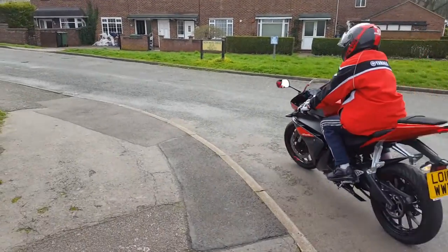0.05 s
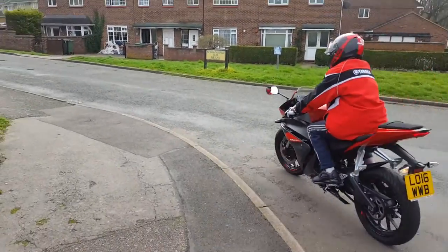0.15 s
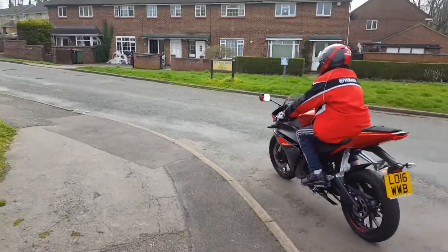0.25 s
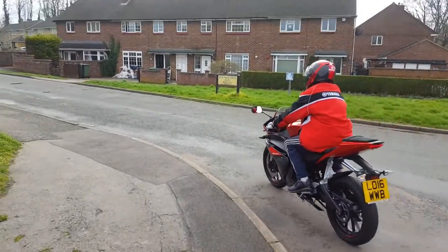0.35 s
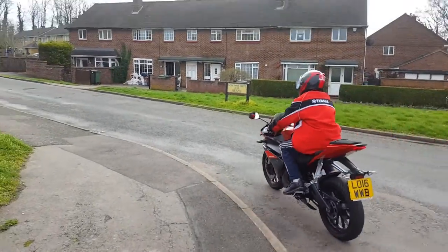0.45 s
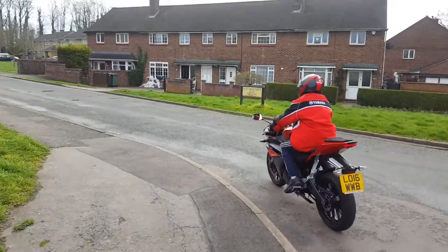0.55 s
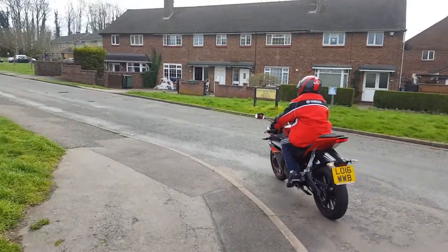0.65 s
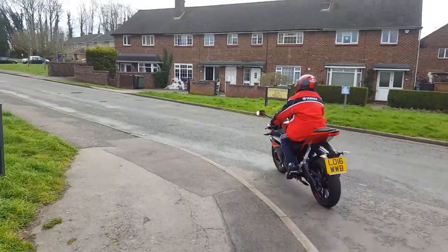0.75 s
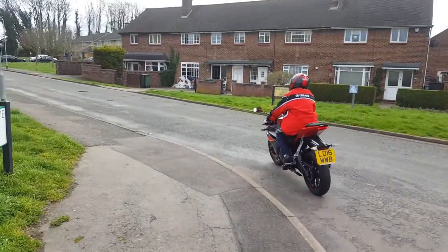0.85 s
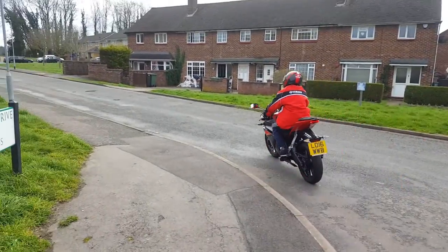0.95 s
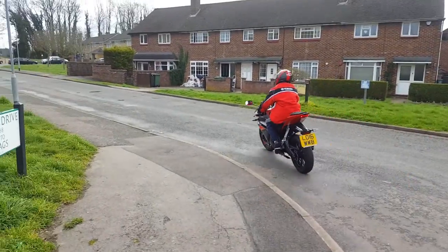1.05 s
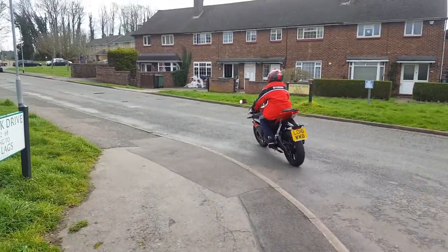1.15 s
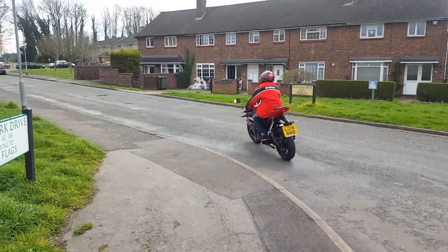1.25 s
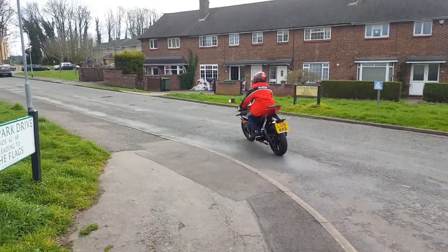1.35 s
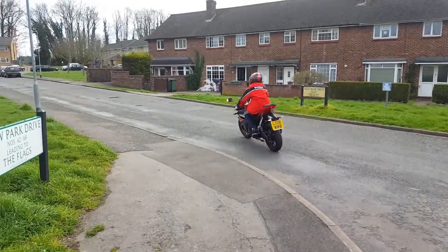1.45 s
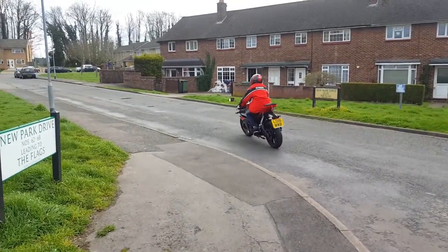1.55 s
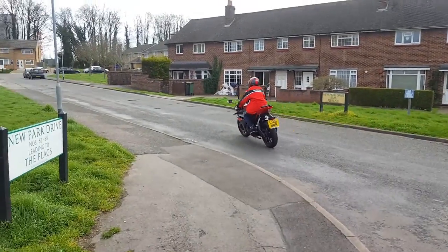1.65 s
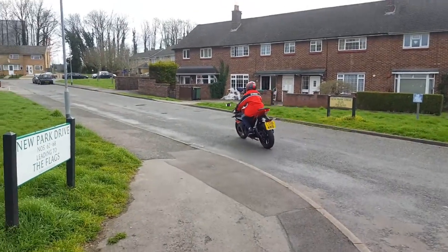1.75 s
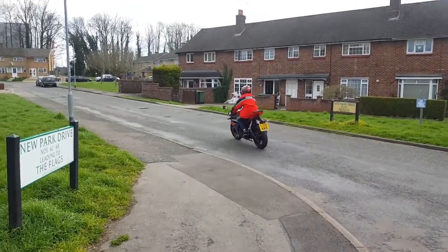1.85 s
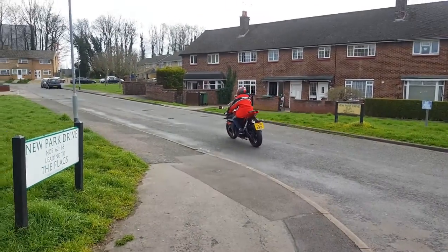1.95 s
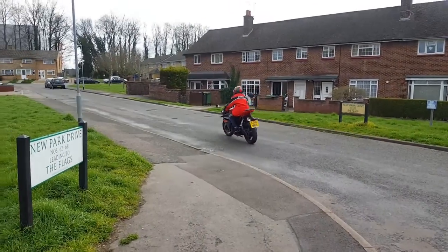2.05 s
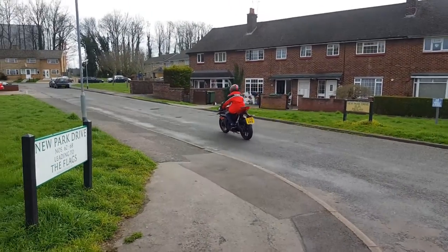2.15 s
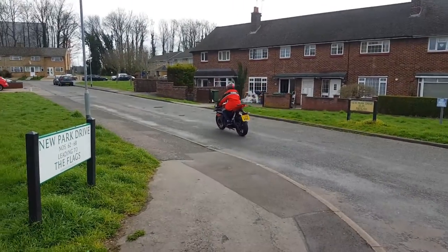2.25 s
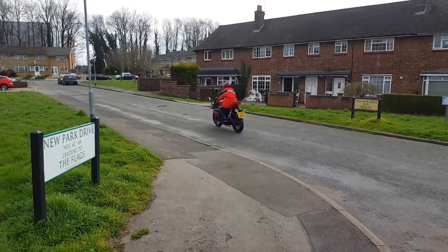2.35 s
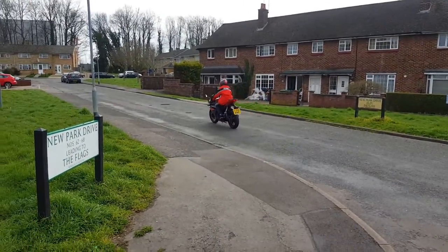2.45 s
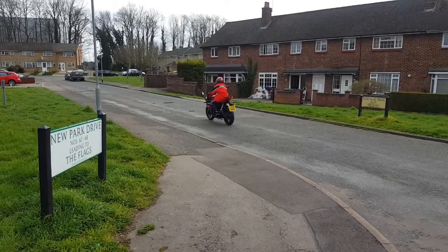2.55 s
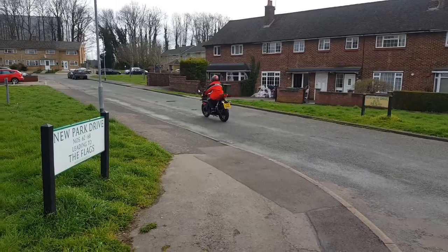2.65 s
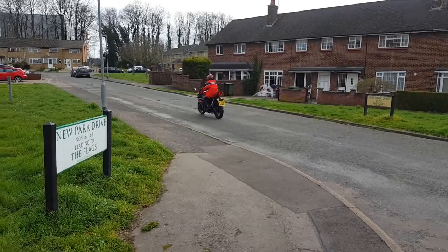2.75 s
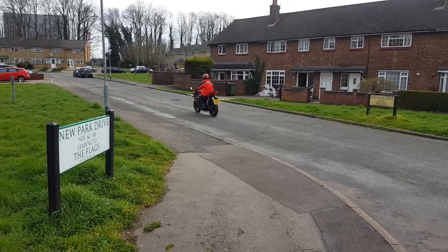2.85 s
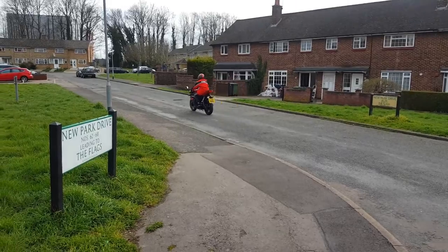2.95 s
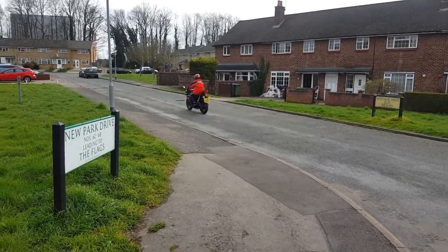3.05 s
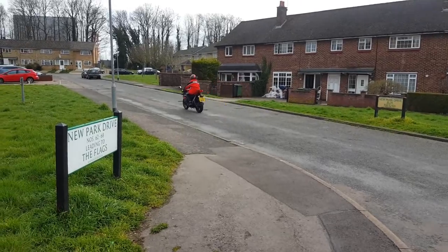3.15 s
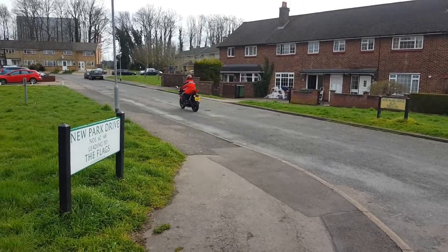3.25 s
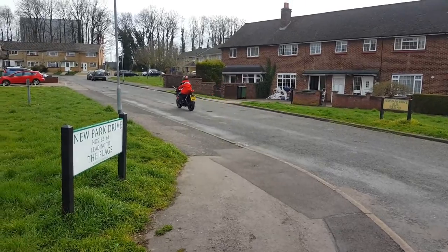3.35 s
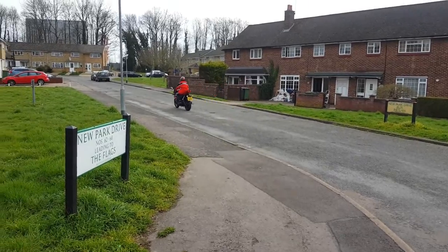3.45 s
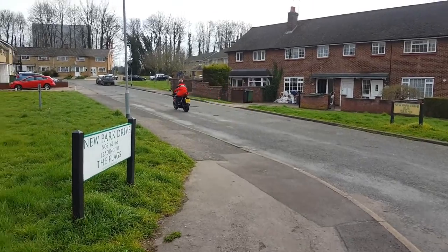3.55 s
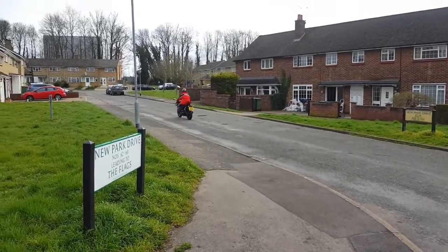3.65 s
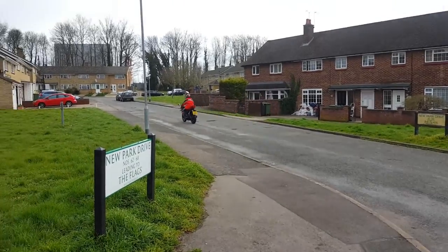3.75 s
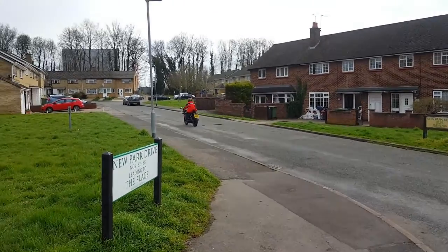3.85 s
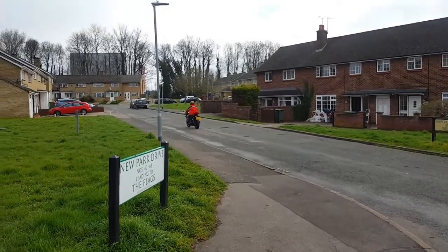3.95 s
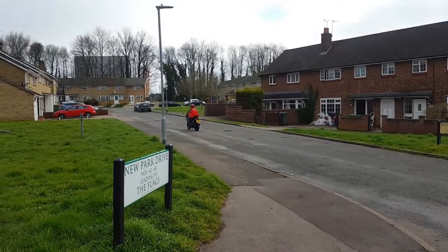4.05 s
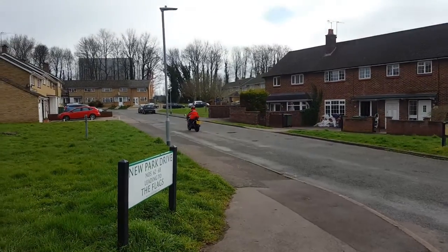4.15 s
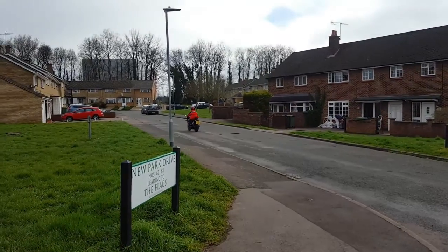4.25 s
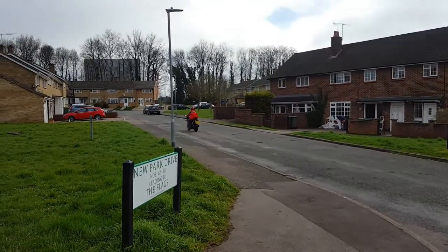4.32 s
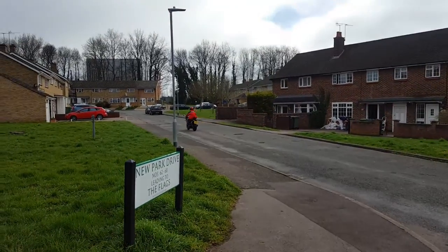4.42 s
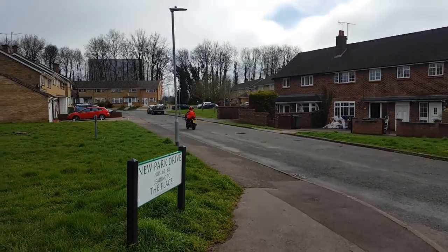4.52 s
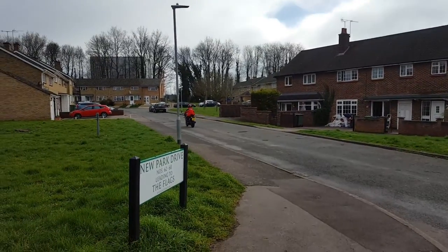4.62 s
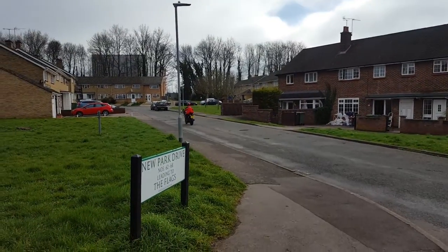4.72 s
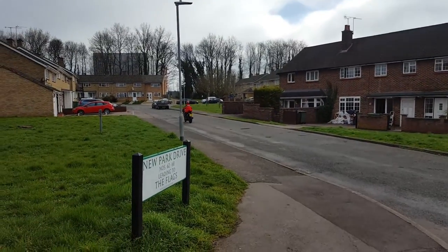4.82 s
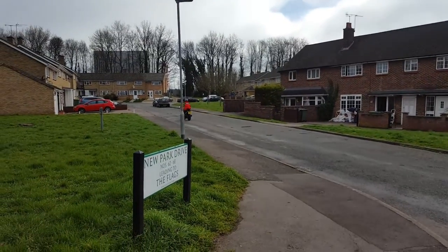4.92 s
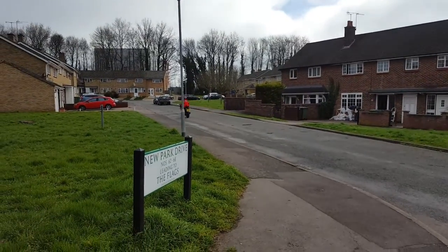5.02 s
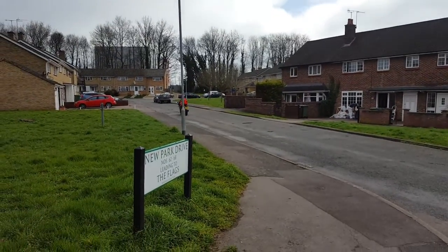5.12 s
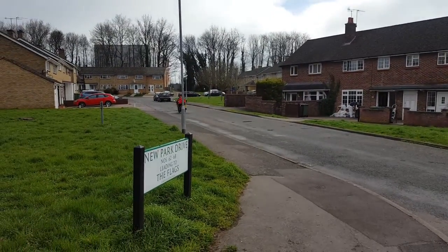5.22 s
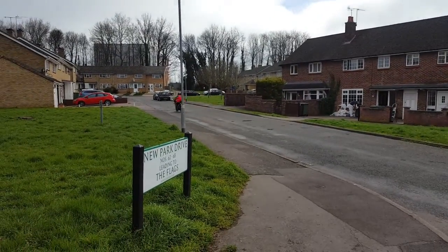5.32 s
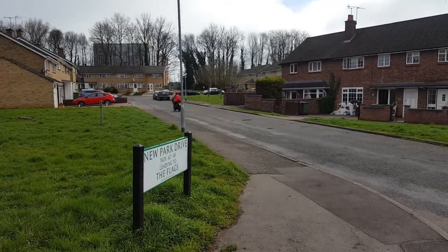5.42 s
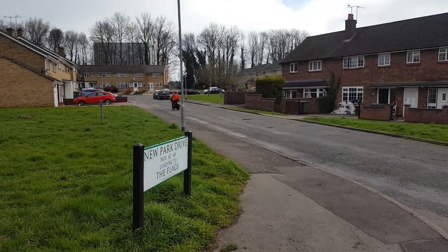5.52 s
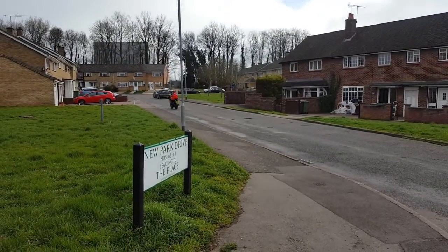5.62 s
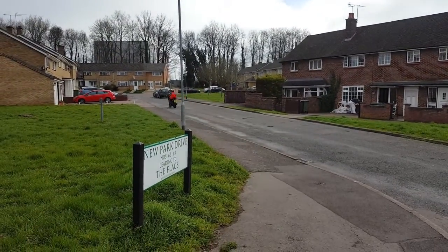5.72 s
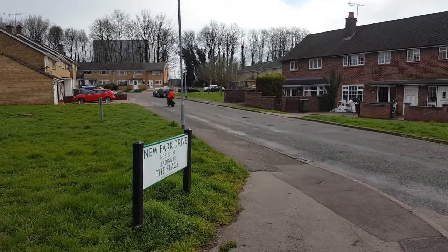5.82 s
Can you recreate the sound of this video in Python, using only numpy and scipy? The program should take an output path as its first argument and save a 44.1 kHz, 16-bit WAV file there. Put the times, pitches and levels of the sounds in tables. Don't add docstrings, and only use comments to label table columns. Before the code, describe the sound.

Outdoors on a street of brick houses, a handheld stereo microphone at the kerb hears a single-cylinder motorcycle leave from about three metres. It thumps loudly with hissing valve gear, dips and pops at an upshift around two seconds, pulls again in a deeper gear, then coasts into a quiet, lumpy idle far off, over low town rumble and small close ticks.

```python
import sys
import numpy as np
from scipy import signal
from scipy.fft import rfft, irfft, next_fast_len
from scipy.io import wavfile
from scipy.ndimage import uniform_filter1d

SR = 44100
rng = np.random.default_rng(int(sys.argv[2]) if len(sys.argv) > 2 else 0)


def transcribe(u):
    v = np.clip(np.atleast_2d(u).T, -1, 1)
    q = np.round(v * 32767).astype(np.int16)
    wavfile.write(sys.argv[1], SR, q)


def gain_from_db(level_db):
    decades = np.asarray(level_db, float) / 20
    return 10 ** decades


N = 259131
A_FIRING_S, IDLE_FIRING_S = 2.704, 5.183
START_M, SPEED_M_S, ACCEL_M_S2 = 2.87, 3.91, 0.79


def level(x, rms_db):
    return x * gain_from_db(rms_db) / np.sqrt(np.mean(x ** 2))


def curves(table):
    s, *columns = np.transpose(table)
    return [np.interp(np.arange(N) / SR, s, column) for column in columns]


def steps(table, slew_s):
    s, *columns = np.transpose(table)
    row = np.maximum(np.searchsorted(s, np.arange(N) / SR, "right") - 1, 0)
    return [uniform_filter1d(column[row], int(slew_s * SR), mode="nearest") for column in columns]


def colour(x, points):
    hz, db = np.transpose(points)
    size = next_fast_len(N + SR // 4)
    f = np.maximum(np.arange(size // 2 + 1) * SR / size, 1)
    gain_db = np.interp(np.log(f), np.log(hz), db)
    return irfft(rfft(x, size) * gain_from_db(gain_db), size)[..., :N]


def blend(x, points, share):
    share = np.clip(share, 0, 1)
    return (1 - share) * x + share * colour(x, points)


def later(x, samples):
    return np.interp(np.arange(N) - samples, np.arange(N), x)


def walk(rate_hz):
    hold = int(SR / rate_hz)
    held = np.repeat(rng.standard_normal(N // hold + 1), hold)
    return 1.48 * uniform_filter1d(uniform_filter1d(held, hold), hold)[:N]


def lingering(x, fall_s):
    share = 1 / (fall_s * SR)
    return np.maximum(x, signal.lfilter([share], [1, share - 1], x))


def ring(x, hz, width_hz):
    return signal.lfilter(*signal.iirpeak(hz, hz / width_hz, SR), x)


def gust():
    peak_s, peak_db, calm_db = 4.62, -65, -90
    rise_db_s, fall_db_s = 20, 130
    t = np.arange(N) / SR - peak_s
    return gain_from_db(np.maximum(peak_db + np.minimum(rise_db_s * t, -fall_db_s * t), calm_db))


# freq_hz, density_db (per Hz)
TOWN_RUMBLE = [(12, -42), (20, -9), (148, 3.5), (404, -3), (505, -7.5), (1010, -12.5), (1230, -17),
               (2140, -19), (2530, -25), (3540, -27.5), (7930, -39), (9370, -49), (15500, -41)]
# freq_hz, level_db
FAR_WHINES = [(505, -53), (4900, -72)]


def town():
    mid, side = colour(rng.standard_normal((2, N)), TOWN_RUMBLE)
    side = colour(side, [(30, -8), (150, -21.5), (600, -4.0), (2500, -2.0), (6000, -1.5)])
    rumble = level(gain_from_db(0.4 * walk(2.46)) * np.array([mid + side, mid - side]), -40.5)
    leaves = gust() * level(ring(rng.standard_normal((2, N)), 9200, 6000), 1.19)
    whines = np.zeros(N)
    for hz, db in FAR_WHINES:
        turns = hz * np.cumsum(1 + 0.00329 * walk(6)) / SR
        whines += gain_from_db(db + 2 * walk(3.3)) * np.sin(2 * np.pi * turns)
    return rumble + whines + leaves


# start_s, peak_db, pitch_hz, t60_s
KNOCKS_AND_TICKS = [(1.4905, -11, 170, .035), (1.912, -31, 2450, .04), (1.914, -32, 4200, .015),
                    (1.916, -31, 6500, .015), (1.917, -35, 12000, .012), (2.76, -44, 7000, .01),
                    (5.015, -38, 1650, .06), (5.203, -54, 6900, .02), (5.215, -52, 6100, .04),
                    (5.312, -47, 6400, .02), (5.483, -46, 3500, .04), (5.488, -44, 1450, .04),
                    (5.67, -48, 4100, .07), (5.69, -48, 3700, .07)]


def knocks():
    out, t = np.zeros(N), np.arange(4096) / SR
    for start_s, peak_db, hz, t60_s in KNOCKS_AND_TICKS:
        blow = 9000 / hz * (t == 0) + rng.standard_normal(len(t))
        width_hz = 200 + .15 * hz
        tail = ring(ring(blow, hz, width_hz), hz, width_hz) * np.exp(-np.log(1000) * t / t60_s)
        start = int(start_s * SR)
        out[start:start + len(t)] += tail * gain_from_db(peak_db) / np.abs(tail).max()
    return out


# freq_hz, t60_s
STREET_DECAY = [(300, .5), (1500, .6), (6000, .14)]


def street(x):
    t = np.arange(SR // 2) / SR
    tail = np.zeros((2, len(t)))
    for hz, t60_s in STREET_DECAY:
        tail += ring(rng.standard_normal((2, len(t))), hz, 2.3 * hz) * np.exp(-np.log(1000) * t / t60_s)
    tail = tail * np.clip((t - .006) / 0.006, 0, 1)
    tail = tail / np.sqrt(np.sum(tail ** 2) / 2)
    return signal.fftconvolve(x[None], tail, axes=1)[:, :N]


def house_fronts(x):
    turn = 2 * np.pi * 0.454 * np.arange(N) / SR
    fronts = np.cos(turn) * street(x) + np.sin(turn) * street(x)
    return colour(fronts, [(60, -23.5), (200, -29), (700, -18), (2000, -9.0), (4000, -8), (9000, -1.0)])


# freq_hz, gain_db
NEAR_LEFT = [(2000, -3.5), (4000, -5), (9000, -5)]
NEAR_RIGHT = [(2000, -3), (4000, 0), (5800, 0), (9000, -20)]


def close_surface(both, metres):
    gain, grow_m = .55, 6
    left = colour(later(both[0], 60), NEAR_LEFT)
    right = colour(later(both[1], 61), NEAR_RIGHT)
    return gain * (1 - np.exp(-(metres - START_M) / grow_m)) * np.array([left, right])


def tyres(level_db):
    centre_hz, width_hz = 3500, 2600
    hiss = ring(ring(rng.standard_normal(N), centre_hz, width_hz), centre_hz, 2 * width_hz)
    return gain_from_db(level_db + 1.8 * walk(6)) * level(hiss, 0)


# freq_hz, density_db (per Hz)
GEAR_SPECTRUM = [(1500, -10), (2500, -8.5), (3140, -4), (4140, -9), (4570, -7), (5600, -8.5), (6240, -13.5),
                 (8030, -10), (9720, -26.5), (12700, -16), (15500, -23.5)]


def valve_gear(phase):
    seats = 0.37 + np.exp(-phase / 0.16) + 0.067 * np.exp(-((phase - .45) % 1) / 0.026)
    return level(seats * gain_from_db(0.5 * walk(6.6)) * colour(rng.standard_normal(N), GEAR_SPECTRUM), 5.17)


def gear_whine(cycles, level_db):
    teeth, wander_db = 48, 4
    return gain_from_db(level_db + wander_db * walk(13.9)) * np.sin(2 * np.pi * teeth * cycles + 3 * walk(25.02))


def bark(phase, throttle):
    rise_cycles, fall_cycles = 0.049, 0.18
    envelope = throttle * (1 - np.exp(-phase / rise_cycles)) * np.exp(-phase / fall_cycles)
    slug = envelope * rng.standard_normal(N)
    return level(ring(slug, 831, 254) - ring(slug, 1000, 260) + 0.55 * ring(slug, 1620, 333), 0)


# freq_hz, density_db (per Hz)
GAS_SPECTRUM = [(200, -20), (330, 3.5), (480, -6.5), (760, -6.5), (930, -19), (1180, -25), (1700, -0.5),
                (2040, -14), (2270, -4.5), (4000, -52.5), (5200, -68), (8800, -88)]
# freq_hz, width_hz, level_db
TAIL_PIPE = [(766, 130, -7.5), (956.4, 67, 5.5), (994, 10, -9.5), (1403, 38, -6.5), (1773, 17, -3.5),
             (2188, 5.2, -25.5)]


def gas_flow(cycles, throttle, ring_db):
    phase = cycles % 1
    puff_db = 0.23 * rng.standard_normal(400)[cycles.astype(int)]
    swell = 0.36 * throttle * (1 - np.exp(-phase / 0.22)) * np.exp(-phase / 0.044)
    puff = gain_from_db(puff_db) * (4.1 + swell)
    flow = rng.standard_normal(N)
    rings = sum(gain_from_db(db + 1.8 * walk(3.328)) * ring(flow, hz, width_hz) for hz, width_hz, db in TAIL_PIPE)
    return level(puff * colour(flow, GAS_SPECTRUM), -3) + gain_from_db(ring_db) * level(puff * rings, -4.0)


def order(x, cycles, count):
    turn = np.exp(2j * np.pi * count * cycles)
    still = x / turn
    real, imag = [uniform_filter1d(uniform_filter1d(part, size=2600), size=2600)
                  for part in (still.real, still.imag)]
    return 2 * ((real + 1j * imag) * turn).real


# slack_db, full_pull_extra_db, shut_throttle_extra_db
PARTIALS = [(16, 13, -20), (0.5, 12.5, -21), (-10, 14.5, 6), (12, -5, -6), (0.5, 4.5, -9.5),
            (8, -10.5, -5.5)]
# freq_hz, gain_db
ROAD_ECHO = [(50, 2), (75, 3), (92, 2.5), (112, -5), (135, -3), (155, 2.5), (185, -1.5), (240, -0.7)]


def lifts(hz, throttle, pull):
    road_hz, road_db = np.transpose(ROAD_ECHO)
    revving = np.clip((hz - 18) / 8, 0, 1)
    lifts_db = []
    for count, (slack_db, pull_db, shut_db) in enumerate(PARTIALS, 1):
        echo_db = np.interp(np.log(count * hz), np.log(road_hz), road_db)
        lift_db = walk(4.973) + slack_db + pull * pull_db + (1 - throttle) * shut_db + throttle * echo_db
        lifts_db.append(revving * lift_db)
    return lifts_db


# freq_hz, width_hz, level_db
SILENCER_HOT = [(77.4, 23.4, -6), (183.5, 36, 6), (242.5, 8.9, -18.5), (276.2, 6.7, -9.5),
                (361, 11.6, -2.5), (672, 36, -6.5), (901, 13, 3), (1710, 34, -2), (2150, 58, -44)]
# freq_hz, width_hz, level_db
SILENCER_COOL = [(75.6, 40, -4.5), (131.4, 47, 8.5), (202.3, 106, -5), (291.4, 49, -3.5)]


def silencer(pulses, modes):
    return level(sum((-1) ** k * gain_from_db(db) * ring(pulses, hz, width_hz)
                     for k, (hz, width_hz, db) in enumerate(modes)), -2.72)


def thump(cycles, hz, throttle, lifts_db):
    fired = np.nonzero(np.diff(np.floor(cycles)))[0]
    scatter = (.038 - .033 * throttle)[fired]
    slip = scatter * rng.standard_normal(len(fired)) * SR / hz[fired]
    size = gain_from_db((1.1 + 37 * scatter) * rng.standard_normal(len(fired))) / np.sqrt(hz[fired])
    pulses = np.zeros(N)
    pulses[np.clip(fired + slip.astype(int), 0, N - 1)] = size
    pulses = uniform_filter1d(pulses, size=32)
    pipe = throttle * silencer(pulses, SILENCER_HOT) + (1 - throttle) * silencer(pulses, SILENCER_COOL)
    pipe = signal.sosfilt(signal.butter(3, 55, "high", fs=SR, output="sos"), pipe)
    return pipe + sum((gain_from_db(db) - 1) * order(pipe, cycles, count) for count, db in enumerate(lifts_db, 1))


def engine(hz, thump_db, gas_db, gear_db, throttle, pull, ring_db, whine_db):
    cycles = np.cumsum(hz) / SR
    cycles = cycles + 1 - cycles[int(A_FIRING_S * SR)] % 1
    phase = cycles % 1
    gas = gas_flow(cycles, throttle, ring_db) + gear_whine(cycles, whine_db)
    gas = gas + gain_from_db(-12.5 + 7 * pull) * bark(phase, throttle)
    blows = thump(cycles, hz, throttle, lifts(hz, throttle, pull))
    return gain_from_db(thump_db) * blows + gain_from_db(gas_db) * gas + gain_from_db(gear_db) * valve_gear(phase)


def in_step(hz):
    coast_s, coast_end_s = 3.8, 4.7
    t = np.arange(N) / SR
    count = np.sum(hz[int(A_FIRING_S * SR):int(IDLE_FIRING_S * SR)]) / SR
    shift_hz = (np.round(count) - count) / (coast_end_s - coast_s)
    return hz + shift_hz * ((t > coast_s) & (t < coast_end_s))


# start_s, firing_hz, effort_db
RIDE = [(0, 47, 2), (.2, 41.4, -0.5), (.41, 33.1, 2.5), (.62, 34.3, 0.5), (.85, 35.9, 3), (1.22, 40.2, 3),
        (1.44, 35.87, 4), (1.74, 36.77, 6), (1.92, 32.43, 7), (2.18, 26.56, 0), (2.42, 34.7, 9.5),
        (2.63, 26.8, 9.5), (3.3, 33, 11.5), (3.7, 37.6, 8), (3.78, 36, 6), (4.2, 28, -0.5),
        (4.85, 17, -13.5), (5.88, 14.7, -5.5)]
# slip, bite, first gear, ease, shut, blip, second gear, gather speed, shut, coast, idle
# start_s, throttle (0-1), pull (0-1), tail_pipe_db
MOVES = [(0, 1, 0.69, 8), (.32, 0.97, 0.53, 5.5), (.6, 0.99, 0.56, 0), (1.24, 0.76, 0.01, 0),
         (1.75, 0.33, 0.49, 0), (2.2, 0.68, 0.17, 3), (2.36, .97, 0.83, 3), (3.3, 0.92, 0.56, 2.5),
         (3.7, 0.34, 0.25, -3.5), (4.2, 0.01, 0.45, 2.5), (4.75, 0.03, 0.3, 16)]
# start_s, level_db
BURNS = [
    (1.89, -5),
    (2.13, 0),
    (2.21, 6),
    (2.32, 2),
    (4.058, -9),
    (4.12, 5),
    (4.97, -22),
    (5.2, 6),
    (5.36, -10),
    (5.44, -4),
]


def bike(metres):
    t = np.arange(N) / SR
    hz, effort_db = curves(RIDE)
    flywheel_s = .07
    hz = in_step(uniform_filter1d(hz, int(flywheel_s * SR), mode="nearest"))
    throttle, pull, ring_db = steps(MOVES, slew_s=.08)
    throttle = np.clip(throttle, 0, 1)
    spread_db = -20 * np.log10(metres / START_M)
    octaves = np.maximum(np.log2(hz / 48.5), -.9)
    hidden = np.clip((t - 4.68) / 0.076, 0, 1)

    burns_db = sum(db * np.exp(-((t - s) / .03) ** 2) for s, db in BURNS)
    idle_db = 5 * np.clip((21 - hz) / 3, 0, 1)
    thump_db = -18 + spread_db + effort_db + burns_db + idle_db

    gas_load_db = lingering(0.53 * effort_db + 0.5 * throttle, fall_s=.3)
    gas_db = -22 + spread_db + gas_load_db + 7 * octaves - 10 * hidden

    gear_load_db = lingering(0.13 * effort_db + 1.5 * pull, fall_s=.9)
    gear_db = -29.5 + 1.196 * spread_db + gear_load_db + 10.5 * octaves - 15 * hidden

    whine_s, whine_length_s, whine_fade_db_s = .82, .22, 45
    outside_s = np.maximum(np.maximum(whine_s - t, t - whine_s - whine_length_s), 0)
    whine_db = -7 - whine_fade_db_s * outside_s

    tyre_db = -48 + spread_db + 20 * np.log10(1 + ACCEL_M_S2 * t / SPEED_M_S) - 11 * hidden
    return tyres(tyre_db) + engine(hz, thump_db, gas_db, gear_db, throttle, pull, ring_db, whine_db)


# start_s, lag_samples
BEARING = [(0, 5.5), (1, 2), (1.8, -1), (2.6, -1.2), (3.7, -1.5), (4.2, -7.5), (5.88, 3)]
# freq_hz, gain_db
SHADOW = [(2500, -1.64), (6000, -2), (8000, -8.5), (15000, -3.5)]
# freq_hz, gain_db
AIR = [(3000, 0.16), (6000, 1.5), (9000, -15.5), (15000, -24)]


def scene():
    t = np.arange(N) / SR
    metres = START_M + SPEED_M_S * t + ACCEL_M_S2 * t ** 2 / 2
    lag_samples, = curves(BEARING)
    dull_m = 27.7
    sound = blend(bike(metres), AIR, (metres - START_M) / dull_m)
    direct = sound + knocks()
    both = np.array([later(direct, lag_samples / 2), later(direct, -lag_samples / 2)])
    both = both + house_fronts(sound) + town()
    both[1] = blend(both[1], SHADOW, (lag_samples - 0.071) / 5.9)
    return gain_from_db(-1.5) * (both + close_surface(both, metres))


def low_pass(x):
    return signal.sosfilt(signal.butter(12, 15620, fs=SR, output="sos"), x)


# freq_hz, left_minus_right_db
LEFT_PORT = [(300, -0.5), (1300, -1.5), (2400, -1), (5600, -3), (6400, 2), (7500, 5.5), (10000, 1.5),
             (15000, 6)]


def record(dry):
    tilt = np.array(LEFT_PORT) * [1, .5]
    ports = np.array([colour(dry[0], tilt), colour(dry[1], tilt * [1, -1])])
    mix = np.tanh(1.327 * ports) / 1.308
    return low_pass(mix)


dry = scene()
out = record(dry)
transcribe(out)
```